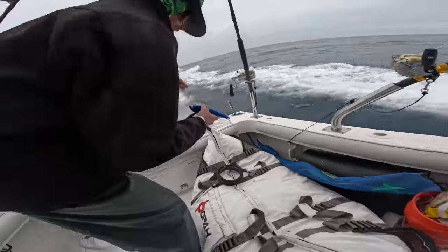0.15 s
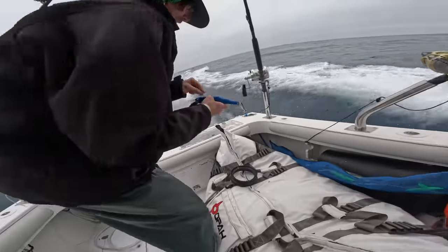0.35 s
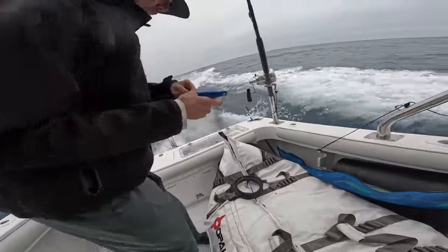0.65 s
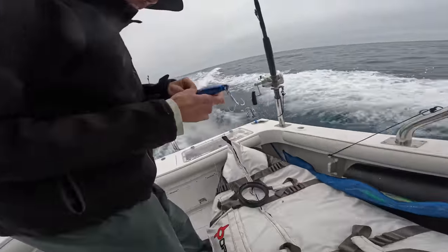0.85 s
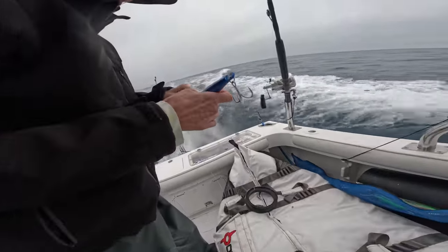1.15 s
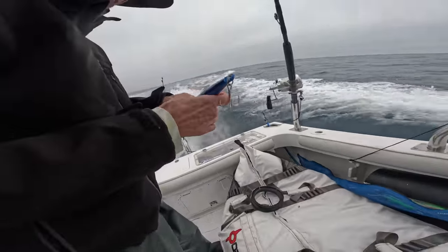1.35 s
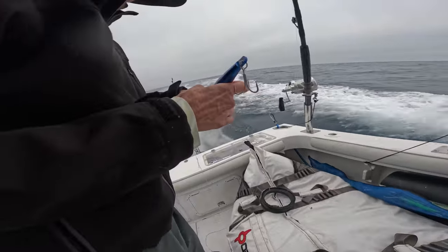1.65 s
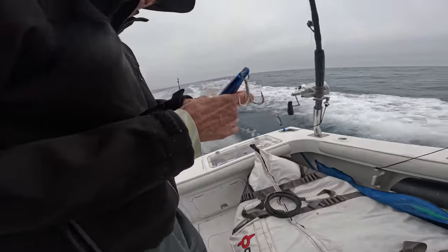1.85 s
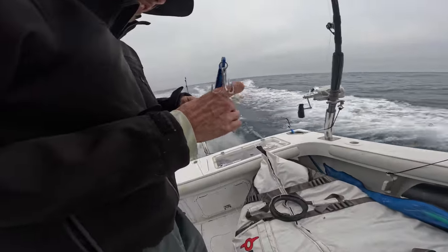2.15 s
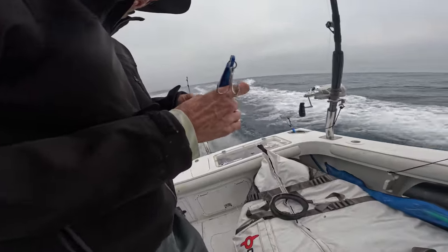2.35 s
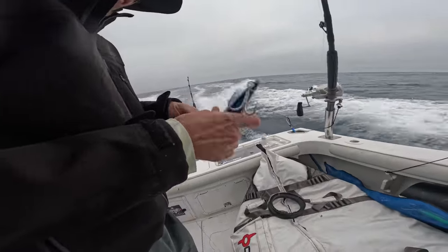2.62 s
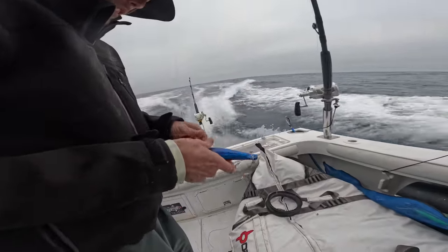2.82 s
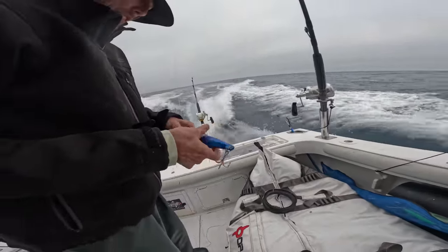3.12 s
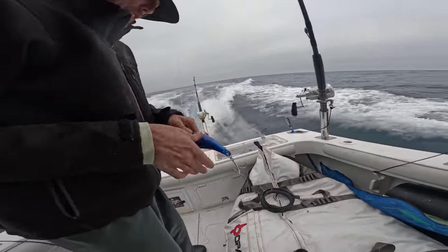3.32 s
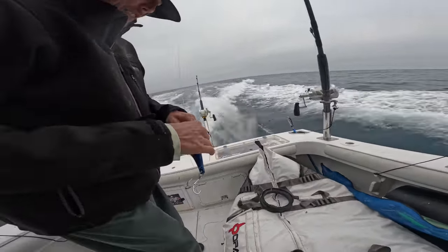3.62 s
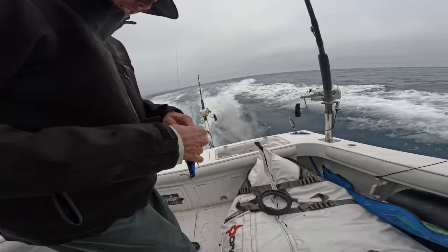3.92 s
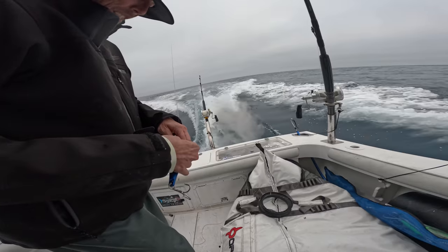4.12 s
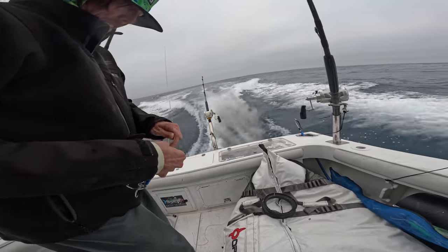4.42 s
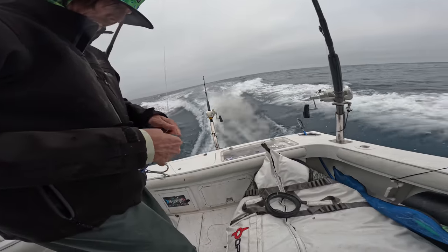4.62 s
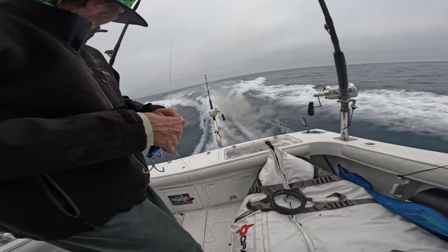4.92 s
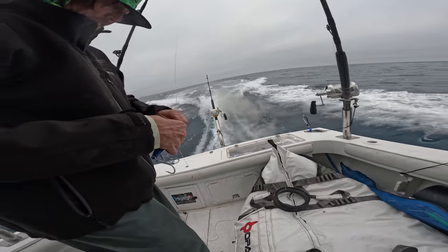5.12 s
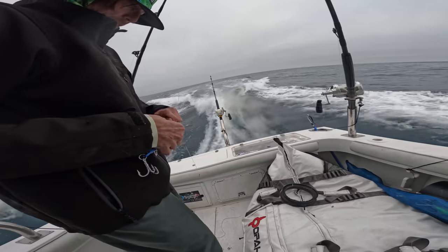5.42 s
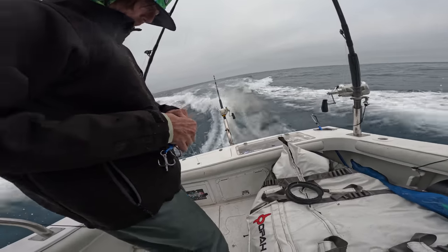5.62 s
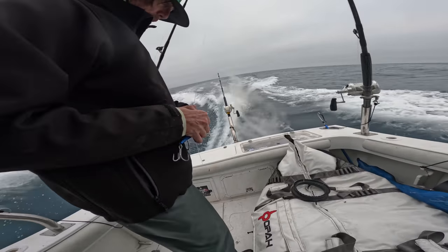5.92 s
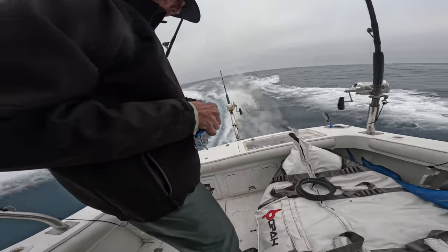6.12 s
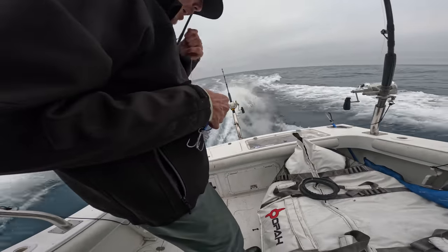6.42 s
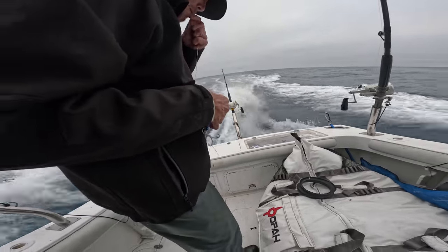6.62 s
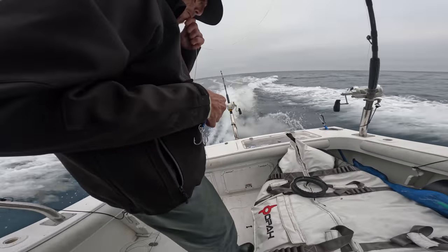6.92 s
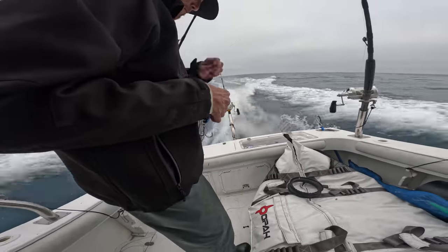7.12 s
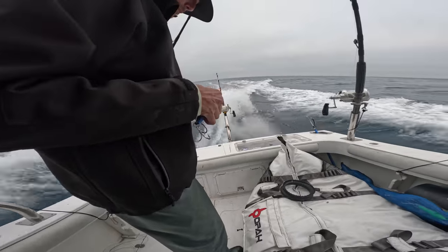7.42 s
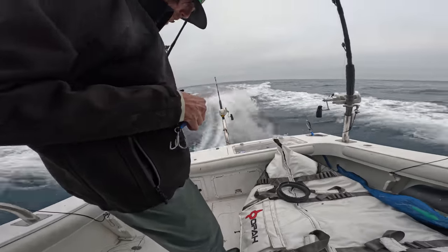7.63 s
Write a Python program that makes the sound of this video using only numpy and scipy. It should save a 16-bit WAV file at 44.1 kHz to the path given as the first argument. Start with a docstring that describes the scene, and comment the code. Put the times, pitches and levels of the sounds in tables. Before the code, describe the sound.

A boat's diesel drones deep and steady over a rushing, foaming wake, with exhaust burbles, a brief hook jingle and slightly rising revs.

```python
"""A fishing boat's six-cylinder diesel drones at trolling speed, heard from the open cockpit over a rushing wake.
With the rolls the exhaust outlet dips: the firing note, built from sines, sinks and gas bubbles burble in the pipe.
Gears and a turbocharger whine faintly, as a sine with its octave and as a fluttering sine.
Near the middle the hooks of a lure jingle in someone's hand, as bursts of grit and decaying steel modes;
at about the same time the throttle opens and the revs rise a little, while the turbocharger climbs."""
import sys
import numpy as np
from scipy import signal
from scipy.fft import rfft, irfft
from scipy.io import wavfile
from scipy.ndimage import uniform_filter1d

SR = 44100
rng = np.random.default_rng(int(sys.argv[2]) if len(sys.argv) > 2 else 0)


def put_to_file(sound):
    """Save the sound as 16-bit audio at rate SR, in the file named by the first command-line argument."""
    columns = np.atleast_2d(sound).T  # one column per channel
    safe = np.clip(columns, -1, 1)
    whole_steps = np.round(safe * 32767)
    wavfile.write(sys.argv[1], SR, whole_steps.astype(np.int16))


N = 342216
TIME = np.arange(N) / SR
THROTTLE_OPENS_S, SETTLE_S = 3.27, 0.6  # settling is the time constant of the ease


def undb(db):
    """Decibels to gain."""
    return 10 ** (np.asarray(db) / 20)


def unit(x):
    """Scale to rms 1."""
    return x / np.sqrt(np.mean(x ** 2))


def noise():
    """White noise for the whole scene."""
    return rng.standard_normal(N)


def curves(table):
    """Each column of a timed table, joined by straight lines."""
    times_s, *columns = np.transpose(table)
    return [np.interp(TIME, times_s, column) for column in columns]


def walk(rate_hz):
    """Smooth random wandering of rms 1, with about `rate_hz` new values a second."""
    hold = max(int(SR / rate_hz), 1)
    steps = np.repeat(rng.standard_normal(N // hold + 1), hold)
    smooth = uniform_filter1d(uniform_filter1d(steps, hold), hold)
    return unit(smooth[:N])


def colour(x, outline):
    """Filter by a (Hz, dB) outline that falls away beyond its ends; rms 1."""
    hz, db = np.transpose(outline)
    f = np.maximum(np.arange(N // 2 + 1) * SR / N, 1)
    gain = undb(np.interp(np.log(f), np.log(hz), db))
    skirts = np.minimum(f / hz[0], 1) ** 2 * np.minimum(hz[-1] / f, 1) ** 2
    return unit(irfft(rfft(x) * gain * skirts, N))


def tone(angle):
    """A sine of rms 1 over whole cycles."""
    return np.sqrt(2) * np.sin(angle)


def turning(hz):
    """Angle in radians reached at a changing rate."""
    return 2 * np.pi * np.cumsum(hz) / SR


def swell(peak_s, half_s):
    """A smooth rise to 1 and fall around a moment."""
    return np.exp(-((TIME - peak_s) / half_s) ** 2)


def by_throttle(low, raised):
    """Ease from the low-throttle value to the raised one once the throttle opens."""
    return raised + (low - raised) * np.exp(-np.maximum(TIME - THROTTLE_OPENS_S, 0) / SETTLE_S)


def bubbles(count, low_hz, high_hz, cycles, spread_db):
    """Short rings at random moments, each gliding upward as the bubble nears the surface."""
    out = np.zeros(N + SR)
    for when, pitch, size in rng.random((count, 3)):
        hz = low_hz * (high_hz / low_hz) ** pitch
        t = np.arange(min(int(cycles * SR / hz), SR)) / SR
        age = t * hz / cycles  # 0 to 1 over the ring
        ring = np.sin(2 * np.pi * hz * t * (1 + age / 8)) * np.exp(-4 * age)
        start = int(when * N)
        out[start:start + len(t)] += undb(spread_db * size) * ring
    return unit(out[:N])


def rolling(sag_hz_per_db=0.3, sag_spread=1.2, burble_spread=1.49):
    """Each dip of the outlet muffles the note, slows the engine by back pressure and alters the burble."""
    # Rolls about every 1.3 s dip the exhaust outlet, and chop adds a few brief dips:
    # deepest_s, half_length_s, firing_note_loss_db, burble_rise_db
    dips = [(0.263, 0.0895, 3, 5), (0.573, .14, 7, 6.5), (1.599, 0.0703, 3, 1), (1.888, .17, 7.5, 6),
            (2.722, .1, 1, 2), (3.105, .19, 8.5, 5.5), (4.39, 0.1465, 3, 1), (5.69, 0.0984, 6, 2),
            (6.983, .3, 3, 4.5), (7.025, .03, 9.5, -1)]
    muffle_db = sum(loss_db * swell(s, half_s) for s, half_s, loss_db, _ in dips)
    # slowing and burbling last a little longer than the muffling
    sag_hz = sum(sag_hz_per_db * loss_db * swell(s, sag_spread * half_s) for s, half_s, loss_db, _ in dips)
    choke_db = sum(rise_db * swell(s, burble_spread * half_s) for s, half_s, _, rise_db in dips)
    return muffle_db, sag_hz, choke_db


def exhaust(crank, note_db, burble_db, choke=0.6):
    """Three firings a turn, rounded by the muffler to a note and two overtones; unequal cylinders add orders."""
    # The firing note's octave comes and goes: time_s, level_db
    octave_levels = [(0.0, -26), (0.17, -38), (0.62, -20), (1.34, -35), (1.6, -21.5), (1.77, -30.5),
                     (2.18, -20.5), (2.64, -48), (2.68, -31), (3.09, -31), (4.08, -46), (4.19, -27),
                     (4.95, -23.5), (5.1, -29), (6.16, -18.5), (6.35, -28), (7.43, -19.5), (7.76, -26)]
    # Weaker engine orders: multiple_of_crankshaft_rate, level_db (before throttle and dips change it)
    crank_orders = [(1, -50), (2, -34.5), (4, -35.5), (4.5, -49), (5, -36.5), (7, -43.5), (8, -39),
                    (10, -41.5), (12, -39), (13, -46.5), (15, -44), (16.5, -47.5), (18, -47)]
    firing = 3 * crank
    octave_db, = curves(octave_levels)
    # roughness follows the burble, so it grows while the outlet is under water
    rough_db = choke * (burble_db - burble_db.mean())

    note = undb(note_db + 0.4 * walk(13)) * tone(firing + 0.03 * walk(24))
    octave = undb(octave_db + 0.72 * walk(10)) * tone(2 * firing + 0.12 * walk(12))
    third_db = by_throttle(low=-34, raised=-38.5) + rough_db + 2.5 * walk(5)
    third = undb(third_db) * tone(3 * firing + 0.25 * walk(7.1))

    # water sloshing in the pipe makes each order waver in level and phase
    uneven = np.zeros(N)
    for order, db in crank_orders:
        angle = order * crank + 0.52 * walk(8) + 2 * np.pi * rng.random()
        uneven += undb(db + 3 * walk(7)) * tone(angle)
    # the engine runs slightly smoother at higher speed, but the louder burble's roughness outweighs it
    uneven_db = by_throttle(low=-2, raised=-3) + rough_db
    return note + octave + third + uneven * undb(uneven_db)


def burble(crank, burble_db, throb=0.11, gulp_share=0.62):
    """Gas breaks out under water in big bubbles, throbbing with each turn of the crankshaft."""
    # Tone of gas bubbling through water at the outlet: pitch_hz, relative_level_db
    gas_outline = [(22, -15), (40, -1.5), (60, 1), (110, -1), (155, 1.5), (195, 2.5), (228, -9), (262, 2),
                   (285, -1.5), (320, -5.5), (355, -6.5), (400, -19), (700, -22)]
    gulps = bubbles(count=900, low_hz=90.4, high_hz=378, cycles=6.8, spread_db=5.5)
    gas = colour(noise(), gas_outline) + gulp_share * colour(gulps, gas_outline)
    return unit(gas * (1 + throb * np.sin(crank))) * undb(burble_db)


def breaking():
    """Levels of churn and foam: they grow with the throttle and surge with each wave."""
    # Waves breaking beside the hull: peak_s, half_length_s, churn_rise_db, foam_rise_db
    waves = [(0.12, .3, 2.5, 1.8), (0.74, 0.37, 4, 3), (2.163, .2, 2, 3), (3.294, 0.33, 3, 3),
             (4.707, 0.2, 0.5, 1.3), (5.86, 0.26, 1.2, 1.9), (7.189, 0.5, 1.4, 3)]
    churn_surge_db = sum(db * swell(s, half_s) for s, half_s, db, _ in waves)
    foam_surge_db = sum(db * swell(s, half_s) for s, half_s, _, db in waves)
    churn_db = by_throttle(low=-34, raised=-32) + churn_surge_db
    foam_db = by_throttle(low=-39, raised=-38) + foam_surge_db
    return churn_db, foam_db


def wake(churn_db, foam_db, plop_share=0.5, fizz_share=0.38, spray_db=-52, spray_growth=1.9):
    """The propellers churn the sea and the crests break into foam: countless bubbles over a rush."""
    # Tumbling water: pitch_hz, relative_level_db
    churn_outline = [(30, -6), (120, -0.5), (400, 1.5), (700, 1), (950, -1.5), (1250, -6.5), (1550, -9.5),
                     (2000, -17), (4000, -27)]
    # Breaking foam: pitch_hz, relative_level_db
    foam_outline = [(600, -11), (1500, 4), (2100, 2), (3000, 1.5), (4100, 0), (5200, -7), (6200, -16.5),
                    (7200, -15), (8600, -27), (10500, -28.5), (11700, -31.5), (12600, -26.5),
                    (13800, -41.5), (15700, -40.5)]
    # Fine spray off the crests: pitch_hz, relative_level_db
    spray_outline = [(3000, -2.5), (4200, 0), (5500, 2), (7200, -5.5), (8600, -16.5), (11700, -22.5),
                     (12700, -19), (15700, -33)]
    plops = bubbles(count=3000, low_hz=350, high_hz=1673, cycles=10.7, spread_db=12)
    fizz = bubbles(count=9000, low_hz=1505, high_hz=6500, cycles=8, spread_db=8)
    churn = unit(colour(noise(), churn_outline) + plop_share * colour(plops, churn_outline))
    foam = unit(colour(noise(), foam_outline) + fizz_share * colour(fizz, foam_outline))
    # harder-breaking crests throw much more spray, so the swells are brighter
    spray_level_db = spray_db + spray_growth * (foam_db - foam_db.mean())
    spray = colour(noise(), spray_outline) * undb(spray_level_db)
    # churn and foam flicker slightly in level
    churn = churn * undb(churn_db + 0.38 * walk(13))
    foam = foam * undb(foam_db + 0.1 * walk(18))
    return churn + foam + spray


def gears(crank, meshes_per_turn=52.8, swell_half_s=0.063, waver_db=0.5, blur_rad=0.45):
    """Gear teeth mesh in step with the crankshaft and whine at the mesh rate and its octave."""
    # Brief swells of the gear whine: peak_s, rise_db
    gear_swells = [(0.08, 5), (1.38, 9.5)]
    swell_db = sum(db * swell(s, swell_half_s) for s, db in gear_swells)
    mesh_db = by_throttle(low=-49.5, raised=-57.5) + swell_db
    octave_db = by_throttle(low=-60, raised=-53)
    mesh = meshes_per_turn * crank + blur_rad * walk(25)
    whine = undb(mesh_db + waver_db * walk(12)) * tone(mesh)
    octave = undb(octave_db + waver_db * walk(14)) * tone(2 * mesh)
    return whine + octave


def turbocharger():
    """A turbine whistle spins up with the throttle; turbulent intake air spreads it into a narrow band."""
    # Course of the whistle: time_s, pitch_hz, level_db
    whistle_course = [(0, 8925, -77), (3.2, 8925, -78), (3.6, 9300, -76), (4.0, 9700, -76),
                      (4.7, 10060, -72), (7.76, 10070, -67)]
    hz, db = curves(whistle_course)
    flutter_hz = by_throttle(low=20, raised=60) * walk(300)
    hz = hz + flutter_hz + 18 * walk(7)
    db = db + 2.2 * walk(90) + 2 * walk(7)
    return undb(db) * tone(turning(hz))


def hooks(focus_hz=1200, other_share=0.07, scrape_db=-13, scrape_s=0.012, ring_db=-3):
    """Steel hooks scrape and tap each other; the point of contact decides which modes ring most."""
    # Hooks touching: start_s, level_db, pitch_hz (that rings most)
    hook_taps = [(2.841, -50, 10400), (2.848, -42, 5141), (2.912, -53, 15500), (2.922, -48, 9300),
                 (2.924, -55, 12290), (2.937, -48, 15500), (2.951, -47, 12290), (2.958, -36, 3700),
                 (2.965, -50, 12290), (3.6, -58, 9300), (3.981, -49, 8400), (3.986, -52, 13700)]
    # Ringing modes of the steel: pitch_hz, relative_level_db, t60_s
    hook_modes = [(3698, 0, .4), (5141, -3, .12), (8646, -8, .09), (9141, -8, .15), (9356, -4, .2),
                  (10410, -7, .12), (11330, -8, .16), (12290, 0, .14), (13300, -7, .14), (15600, -3, .05)]
    out = np.zeros(N + SR)
    t = np.arange(SR // 2) / SR
    grit = colour(noise(), [(3000, -3), (7000, 0), (12000, -8), (15500, -12)])[:len(t)]
    for start_s, tap_db, pitch_hz in hook_taps:
        # each scrape starts elsewhere in the grit, with either polarity
        scrape = rng.choice([-1, 1]) * np.roll(grit, rng.integers(len(t)))
        tap = undb(scrape_db) * scrape * np.exp(-t / scrape_s)
        for hz, db, t60_s in hook_modes:
            share = other_share + np.exp(-((hz - pitch_hz) / focus_hz) ** 2)
            ring = np.sin(2 * np.pi * (hz * t + rng.random())) * np.exp(-np.log(1000) * t / t60_s)
            tap = tap + undb(db + ring_db) * share * ring
        start = int(start_s * SR)
        out[start:start + len(t)] += undb(tap_db) * tap
    return out[:N]


def scene():
    """Everything in the open air of the cockpit, with no walls to echo."""
    muffle_db, sag_hz, choke_db = rolling()
    firing_hz = by_throttle(low=79.62, raised=84.34) - sag_hz
    crank = turning(firing_hz) / 3  # three firings a turn
    note_db = by_throttle(low=-12.5, raised=-13.5) - muffle_db
    burble_db = by_throttle(low=-29.5, raised=-26) + choke_db
    churn_db, foam_db = breaking()

    engine = exhaust(crank, note_db, burble_db) + burble(crank, burble_db)
    whines = gears(crank) + turbocharger()
    mix = engine + wake(churn_db, foam_db) + whines + hooks()
    return mix[None]  # one channel


def record(dry):
    """A small microphone's top end: a steep low-pass at 15.7 kHz."""
    low_pass = signal.ellip(8, 0.2, 70, 15700, fs=SR, output="sos")  # order, ripple dB, stopband dB, Hz
    return signal.sosfilt(low_pass, dry)


dry = scene()
out = record(dry)
put_to_file(out)
```